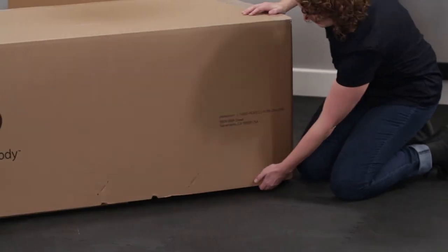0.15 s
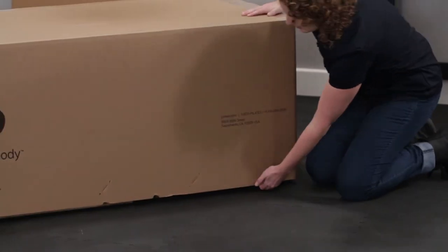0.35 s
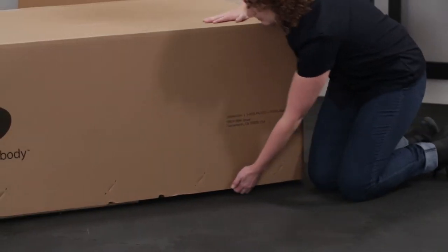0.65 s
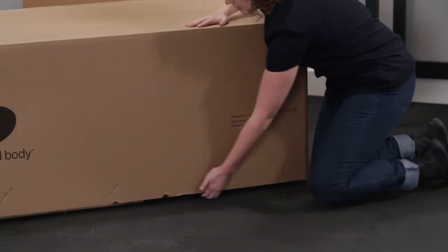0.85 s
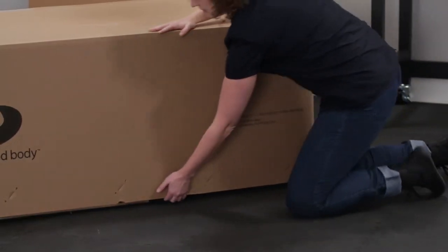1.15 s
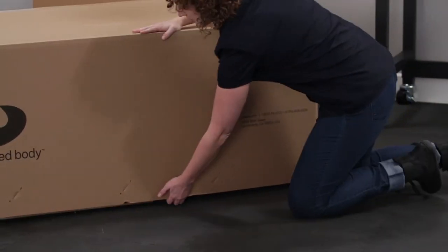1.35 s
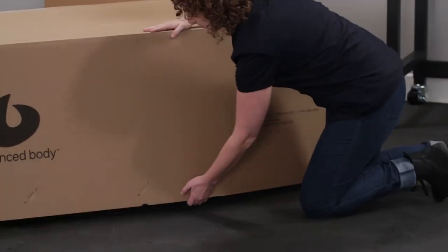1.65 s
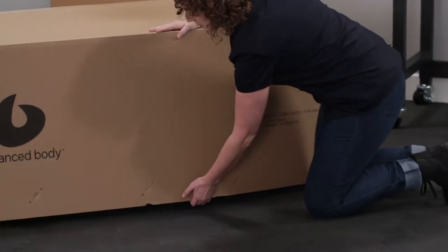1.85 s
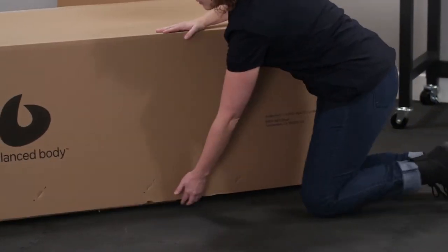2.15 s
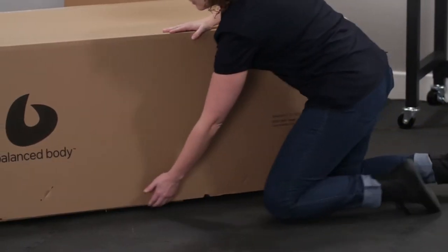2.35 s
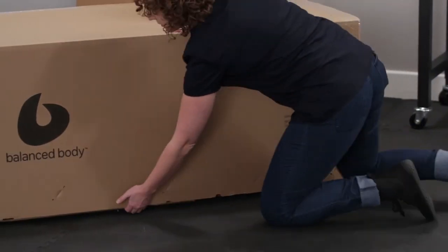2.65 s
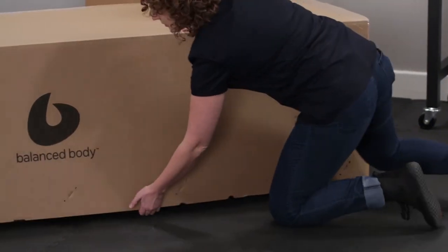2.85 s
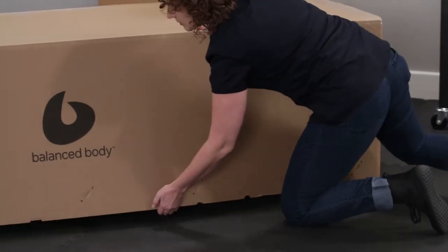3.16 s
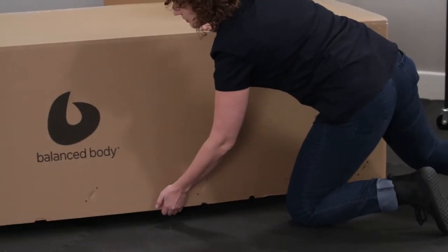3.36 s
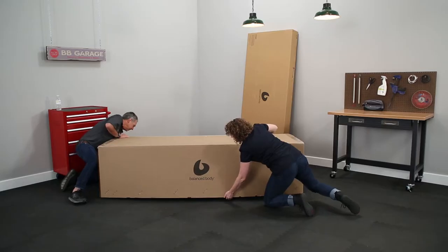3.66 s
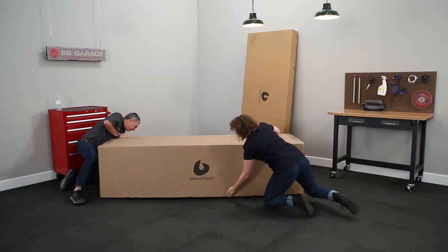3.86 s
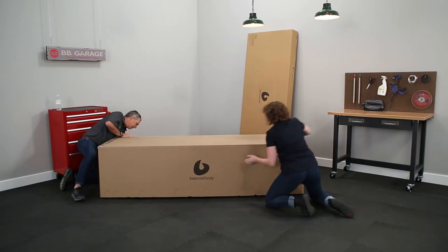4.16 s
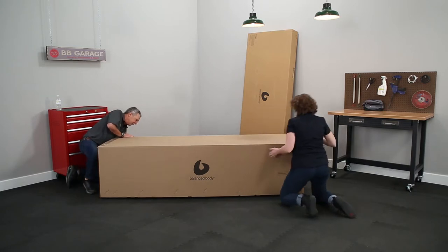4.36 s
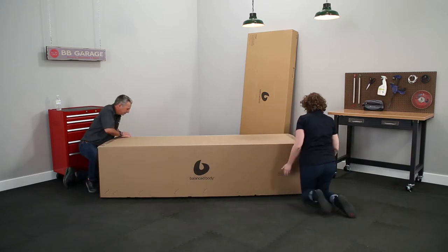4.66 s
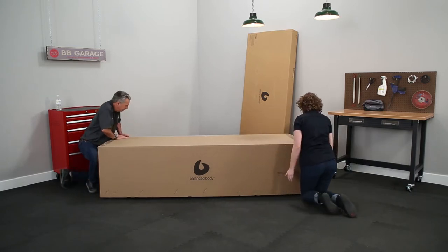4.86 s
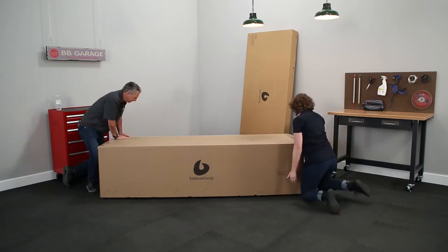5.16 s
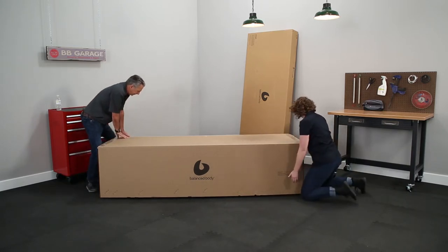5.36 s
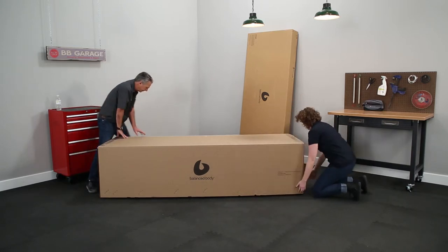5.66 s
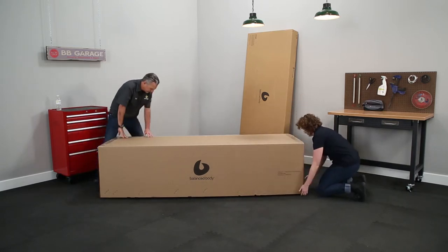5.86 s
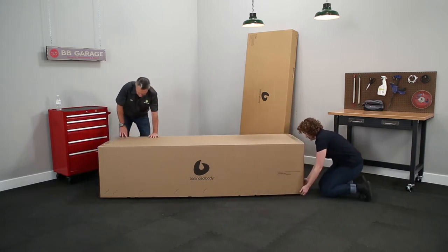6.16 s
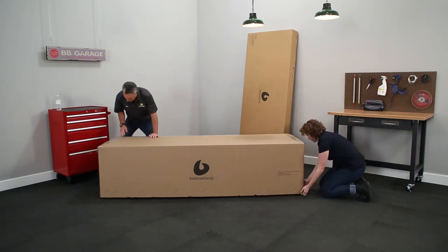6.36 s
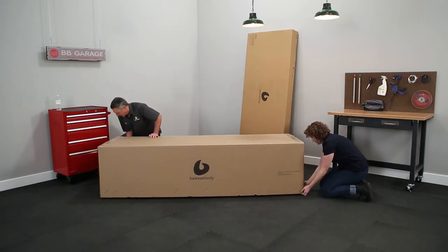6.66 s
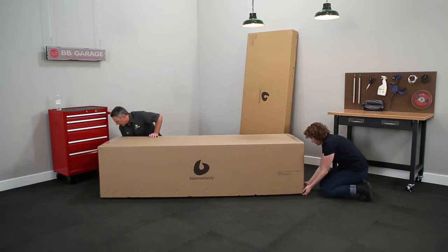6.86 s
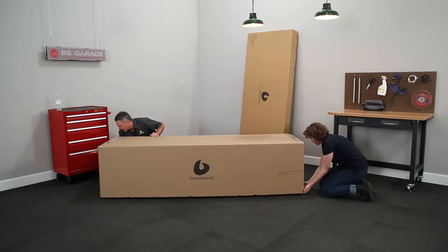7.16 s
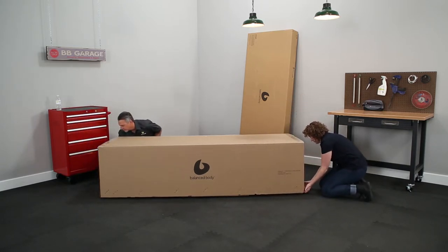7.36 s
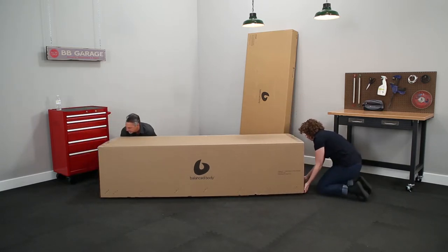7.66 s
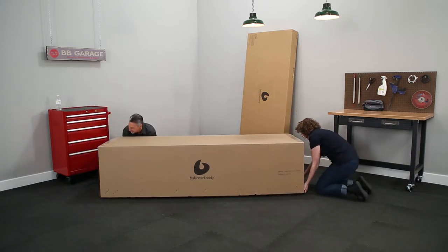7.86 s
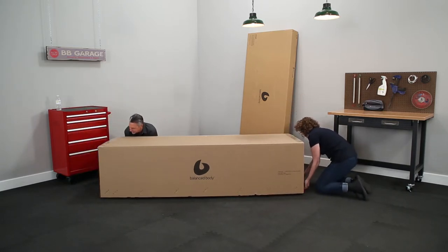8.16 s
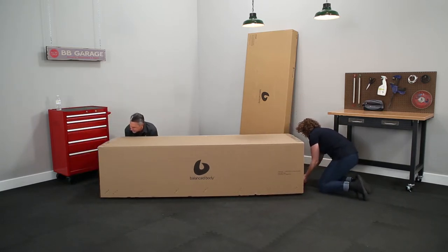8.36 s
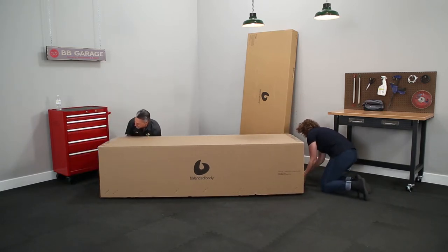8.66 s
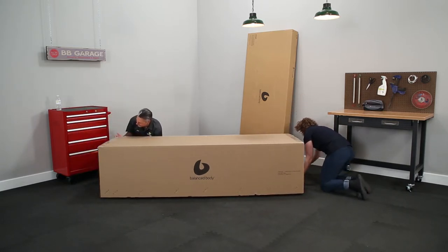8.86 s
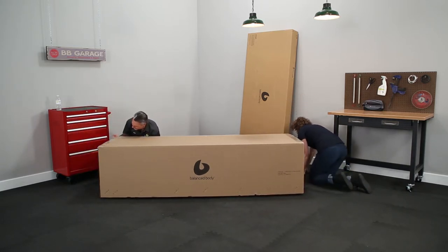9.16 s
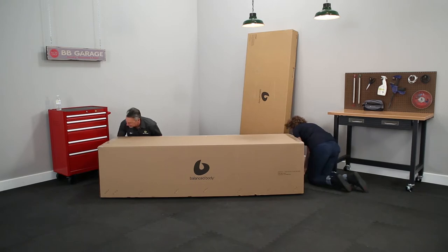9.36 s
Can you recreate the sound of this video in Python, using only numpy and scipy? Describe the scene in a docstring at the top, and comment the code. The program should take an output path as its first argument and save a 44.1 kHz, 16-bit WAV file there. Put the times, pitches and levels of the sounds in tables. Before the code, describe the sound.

In a quiet workshop, two people work staples from a long cardboard crate. A sleeve rustles close against a body-worn microphone while knees shift on a mat. Sharp hollow snaps and brief creaks come early, then scrapes and a cluster of pops around three seconds. A quieter stretch of rustling and light finger ticks follows, before hard snaps near seven and eight seconds. The box booms and the room adds a short tail.

```python
"""A sleeve brushing a body-worn microphone is heard first, with knees shifting on the mat and a steady hush.
Two people work staples out of a long cardboard crate, while cloth and knees go on moving throughout:
the board creaks, scrapes and snaps sharply. Friction is filtered noise under stroke envelopes;
contacts are short forces sent through the panel as bending waves, treble first and bass last,
which then boom in the box and the room."""
import sys
import numpy as np
from scipy import signal
from scipy.fft import rfft, irfft, next_fast_len
from scipy.io import wavfile
from scipy.ndimage import map_coordinates

SR = 44100
rng = np.random.default_rng(int(sys.argv[2]) if len(sys.argv) > 2 else 0)


def master(y):
    """Save y as 16-bit WAV."""
    cut = np.clip(np.atleast_2d(y).T, -1, 1)
    pcm = np.round(cut * 32767)  # scale
    wavfile.write(sys.argv[1], SR, pcm.astype(np.int16))


N = 418950
SIZE = 8192  # samples in one contact
HZ = np.fft.rfftfreq(SIZE, 1 / SR)
LEAD = SIZE // 16  # samples kept free ahead of a contact


def amp(db):
    """Decibels to gain."""
    return 10 ** (np.asarray(db) / 20)


def unit(x):
    """Scale to rms 1."""
    return x / np.sqrt(np.mean(x ** 2) + 1e-20)


def along(points, hz):
    """Read (frequency [Hz], value) points on a log frequency axis."""
    f, v = np.transpose(points)
    return np.interp(np.log(hz + 1), np.log(f + 1), v)


def wobble(rate):
    """A smooth random curve with rate knots a second."""
    coarse = np.arange(0, N, max(1, int(SR / rate) // 10))
    knots = rng.standard_normal(int(N * rate / SR) + 4)
    values = map_coordinates(knots, [coarse * rate / SR])
    return np.interp(np.arange(N), coarse, values)


def filtered(x, response):
    """Multiply the spectrum of x by a response of frequency, which may be complex."""
    m = next_fast_len(N + SR // 2)
    return irfft(rfft(x, m) * response(np.fft.rfftfreq(m, 1 / SR)), m)[:N]


# hush of the workshop at the microphone, spectrum: (frequency [Hz], relative level [dB])
AIR_SPECTRUM = [(15, -34.5), (25, -9), (92, -1), (545, -7.5), (624, -3), (677, -4), (1190, -12.5),
                (4490, -17), (6920, -32.5), (14000, -37), (16000, -13)]


def air():
    """The steady hush of the workshop: noise shaped by its spectrum."""
    hush = filtered(rng.standard_normal(N), lambda hz: amp(along(AIR_SPECTRUM, hz)))
    return amp(-59) * unit(hush)


def rub(spectrum, grain_db, flutter_db, patchy_db):
    """Friction of rms 1: tiny uneven catches under fluttering pressure, their colour shifting with the contact."""
    pressure_db = grain_db * wobble(900) + flutter_db * wobble(35)
    catches = rng.standard_normal(N) * amp(pressure_db)
    hz, t, z = signal.stft(catches, nperseg=512)
    # a random map over pitch and time colours the contact
    place = np.meshgrid(2.5 * np.log2(1 + hz * SR / 300), t / SR * 7, indexing="ij")
    field = map_coordinates(rng.standard_normal((20, 72)), place, mode="nearest")
    shifting = signal.istft(z * amp(patchy_db * field), nperseg=512)[1][:N]
    return unit(filtered(shifting, lambda hz: amp(along(spectrum, hz))))


def strokes(rows, rest_db, unsteady_db):
    """Gain of (start [s], length [s], level [dB]) strokes that speed up, hold and slow, over a faint stirring."""
    rise, fall = 0.22, 0.35  # shares of a stroke spent speeding up and slowing down
    coarse = np.arange(0, N, 32)
    start, length, db = np.transpose(rows)[..., None]
    progress = (coarse / SR - start) / length
    speed = np.clip(np.minimum(progress / rise, (1 - progress) / fall), 0, 1)
    gain = np.sqrt(amp(rest_db) ** 2 + np.sum((amp(db) * speed) ** 2, axis=0))
    return np.interp(np.arange(N), coarse, gain) * amp(unsteady_db * wobble(10))


# knees and shoes shifting on the mat: (start [s], length [s], level [dB])
SHIFTS_ON_MAT = [(-0.03, 0.18, -43.5), (0.13, 0.34, -50), (0.4, 0.21, -46), (0.84, .3, -45),
                 (1.7, 0.66, -48.5), (2.45, 0.23, -60), (2.92, 0.25, -47.5), (3.1, 0.87, -47),
                 (3.68, 0.29, -47.5), (4.08, 0.44, -49.5), (4.56, 0.37, -50), (5.68, .36, -56),
                 (6.25, 0.32, -56), (6.86, 0.25, -56), (7.32, 0.39, -53.5), (7.9, 0.54, -51.5),
                 (9.38, 0.29, -48)]
# spectrum of that shifting: (frequency [Hz], relative level [dB])
KNEE_SPECTRUM = [(20, -32), (45, -4), (85, 2.5), (130, 0.5), (185, -0.5), (260, -1.5), (340, -2),
                 (550, -10), (1200, -26.5)]


def knees():
    """Knees and shoes shift on the mat: strokes of mostly low friction."""
    gain = strokes(SHIFTS_ON_MAT, rest_db=-59, unsteady_db=1.5)
    return gain * rub(KNEE_SPECTRUM, grain_db=2.0, flutter_db=1.5, patchy_db=1.5)


# sleeve or shirt brushing past the body-worn microphone:
# (start [s], length [s], level before mixing [dB], sheen relative to that level [dB])
SHIRT_BRUSHES = [(-0.02, 0.12, -50.5, -19), (0.153, 0.053, -48.5, 0), (0.26, 0.2, -53.5, 0.5),
                 (0.383, 1.16, -44, 5), (0.908, 0.1, -39, 7), (1.625, 0.18, -46, -6),
                 (1.84, .14, -42.5, -3), (2.009, 0.24, -44, -2), (2.331, 0.12, -55.5, -6),
                 (2.614, 0.084, -48.5, -9), (3.21, 0.099, -50, 3), (3.446, .19, -46, 1),
                 (3.985, 0.3, -50, -1), (4.282, .19, -51.5, -8), (4.574, 0.26, -66, 8),
                 (4.692, 0.2, -46.5, 0.5), (5.54, 0.52, -52, -4), (5.896, 0.32, -49, -1.5),
                 (6.173, 0.25, -54, -3), (6.329, 0.22, -48.5, -23), (6.783, 0.13, -57.5, 3),
                 (6.928, 0.042, -50.5, 7), (6.982, 0.12, -51, 0), (7.238, 0.16, -45.5, 1),
                 (7.468, 0.12, -53, 8), (7.654, 0.32, -49, 2), (7.905, 0.11, -46, -5),
                 (7.999, 0.14, -43.5, 2), (8.196, 0.21, -55, -4), (8.375, 0.21, -42.5, -3),
                 (8.614, 0.25, -45, -3), (8.845, 0.26, -47, 5.5), (9.087, 0.31, -48, 1.5),
                 (9.368, 0.24, -46, -4.5)]
# spectrum of the cloth: (frequency [Hz], relative level [dB])
CLOTH_SPECTRUM = [(800, -29.5), (2000, -13.5), (3200, -8), (5000, -5), (8000, -0.5), (12500, 2),
                  (15200, -0.5), (16000, -9)]


def shirts():
    """Cloth brushes close to the microphone: a swish and, above about 9.5 kHz, a sheen with its own level."""
    rest_db = -60.5  # stirring between strokes, before mixing
    swish_rows = [row[:3] for row in SHIRT_BRUSHES]
    sheen_rows = [(s, length, db + sheen_db) for s, length, db, sheen_db in SHIRT_BRUSHES]
    swish_gain = strokes(swish_rows, rest_db, unsteady_db=1.0)
    sheen_gain = strokes(sheen_rows, rest_db, unsteady_db=0.5)
    cloth = rub(CLOTH_SPECTRUM, grain_db=1.0, flutter_db=1.5, patchy_db=2.2)
    swish = filtered(cloth, lambda hz: 1 / (1 + (hz / 9500) ** 6))
    sheen = cloth - swish
    return amp(-3.25) * swish_gain * unit(swish) + amp(-4.6) * sheen_gain * unit(sheen)


def causal(db):
    """A minimum-phase response with this gain in dB, which starts only after the blow."""
    cepstrum = irfft(np.log(amp(db)))
    cepstrum[1:SIZE // 2] *= 2
    cepstrum[SIZE // 2 + 1:] = 0
    return np.exp(rfft(cepstrum))


# colour of the corrugated board: (frequency [Hz], gain [dB])
BOARD_COLOUR = [(20, -40), (32, -26), (50, -12.5), (88, 4), (130, -1), (175, 8), (255, -6), (345, 5),
                (520, -4.5), (650, -1.5), (780, 0), (1000, -4), (1450, -8.5), (1900, -11.5), (2400, -17),
                (3100, -19), (4000, -20.5), (6000, -22), (12000, -29), (16000, -36.5)]


def panel(lag, echo_db, knee_hz=200):
    """Corrugated board carries treble at once, while its bass bends along about lag seconds late."""
    delay = lag * np.exp(0.2133 * rng.standard_normal()) / (1 + (HZ / knee_hz) ** 1.4)
    bending = np.exp(-2j * np.pi * np.cumsum(delay) * SR / SIZE)  # phase sums the delay over frequency
    # edges and folds return the wave many times, duller the longer it has run
    late = rng.uniform(0.002077, .03, (14, 1))  # s
    sign = rng.choice([-1, 1], (14, 1))
    loss_db = echo_db - late * (330 + HZ / 3.85)
    edges = np.sum(sign * amp(loss_db) * np.exp(-2j * np.pi * HZ * late), axis=0)
    # the straight path carries little bass
    direct = 0.78 * rng.choice([-1, 1]) * 1j * HZ / (500 + 1j * HZ)
    direct = direct * np.exp(-2j * np.pi * HZ * rng.uniform(0, 0.00061))
    return causal(along(BOARD_COLOUR, HZ)) * (direct + bending * (1 + edges))


# boom, thump, knock, crack and fizz of the board: (low edge [Hz], high edge [Hz])
CONTACT_BANDS = [(40, 135), (135, 400), (400, 1400), (1400, 4500), (4500, 16000)]
BAND_CENTRES = np.sqrt(np.prod(CONTACT_BANDS, axis=1))  # Hz
OCTAVES = np.log2(BAND_CENTRES / 420)


def balance(tone, db, brightness=0):
    """Level of each band for one contact: the tone of its kind, tilted in dB per octave by its brightness."""
    return db + np.array(tone) + brightness * OCTAVES[:len(tone)]


def add(track, s, force, levels_db, lag, echo_db):
    """Send a force through the panel and place it at s seconds with its own balance from boom to fizz."""
    z = rfft(force, SIZE) * panel(lag, echo_db)
    span = .03 * SR  # band levels count energy over 30 ms
    power = [2 * np.sum(np.abs(z[(HZ >= lo) & (HZ < hi)]) ** 2) / SIZE / span for lo, hi in CONTACT_BANDS]
    correction_db = levels_db - 10 * np.log10(np.array(power) + 1e-20)
    colour = np.column_stack([BAND_CENTRES, correction_db])
    wave = np.roll(irfft(z * causal(along(colour, HZ))), LEAD)
    start = max(round(s * SR) - LEAD, 0)
    track[start:start + SIZE] += wave[:len(track) - start]


def tearing(length, grain_db, release, rise):
    """Uneven breaks, as of fibres, for length seconds, swelling over the share rise; energy 1."""
    t = np.arange(SIZE) / SR
    clumps = np.repeat(rng.standard_normal(SIZE // 32), 32)
    swell = 1 - np.exp(-t / abs(rise * length))
    fade = np.exp(-np.maximum(t - length, 0) / release)
    force = rng.standard_normal(SIZE) * amp(grain_db * clumps) * swell * fade
    return force / np.linalg.norm(force)


SNAP_RISE = .2  # share of its length over which a snap, thud or tick swells


def blow(length):
    """A gritty contact with one blunt push of the board early in it."""
    instant = np.arange(SIZE) == int(.3 * length * SR)
    push = signal.lfilter(*signal.butter(1, 1500, fs=SR), instant)
    return tearing(length, grain_db=3.5, release=0.0029, rise=SNAP_RISE) + 0.59 * push


# crate bumping on the mat or against a knee: (time [s], length [s], strength [dB])
CRATE_BUMPS = [(0.017, .005, -58), (1.716, 0.0039, -17.5), (1.998, 0.0028, -43), (2.131, 0.0059, -44.5),
               (3.19, .021, -25), (3.214, 0.02, -20), (3.465, 0.0013, -34.5), (3.856, 0.0093, -36.5),
               (4.231, .014, -49), (4.364, 0.0096, -53), (4.792, 0.0069, -45.5), (6.799, 0.0043, -36),
               (7.009, 0.01, -42.5), (7.118, 0.0077, -44.5), (7.872, 0.0038, -42), (8.175, .0024, -42),
               (9.436, 0.0078, -42.5)]


def thuds():
    """Soft, heavy contacts that move mostly the bass of the panel."""
    tone = [-6.5, 0, -15, -26, -24.5]  # dB, boom to fizz
    track = np.zeros(N)
    for s, length, db in CRATE_BUMPS:
        add(track, s, blow(length), balance(tone, db), lag=0.0153, echo_db=-13.5)
    return track


# ringing of the hollow crate: (frequency [Hz], width [Hz], relative level [dB])
CRATE_MODES = [(85, 4.8, -1), (163, 14, -7.5), (201, 3.2, -4.5), (321, 24, -2), (745, 100, -5.5),
               (910, 39, -11.5), (1640, 220, -14.5), (2350, 120, -15.5)]


def crate(x):
    """The hollow box rings on in its broad modes, 8 ms behind the board."""
    def modes(f):
        return sum(amp(db) * 1j * f * width / (centre * centre - f * f + 1j * f * width)
                   for centre, width, db in CRATE_MODES)
    return filtered(x, lambda f: modes(f) * np.exp(-2j * np.pi * f * .008))


# time for the workshop's tail to fall 60 dB: (frequency [Hz], time [s])
ROOM_DECAY = [(60, 1), (170, 0.56), (420, 0.37), (1100, 0.55), (3000, 0.41), (10000, 0.088)]
# strength of that tail at the microphone: (frequency [Hz], level [dB])
ROOM_TAIL_LEVEL = [(60, -8.5), (200, -11), (500, -13.5), (800, -17), (1400, -17), (1900, -15),
                   (2500, -18.5), (10000, -14.5)]


def room(x, count=12):
    """Diffuse tails of decaying noise, a fresh one for each of count equal stretches of time."""
    wet = np.zeros(N + SR)
    for part in np.array_split(np.arange(N), count):
        hz, t, z = signal.stft(rng.standard_normal(SR * 3 // 4), SR, nperseg=256)
        fall = amp(-60 * t / along(ROOM_DECAY, hz)[:, None])
        decay = fall * (1 - np.exp(-t / 0.0092))  # the tail builds up over some 9 ms
        level = amp(along(ROOM_TAIL_LEVEL, hz))[:, None]
        decay *= level / np.sqrt(np.mean(decay ** 2, axis=1, keepdims=True))
        tail = signal.istft(z * decay, SR, nperseg=256)[1]
        answer = signal.fftconvolve(x[part], tail / np.sqrt(len(tail)))
        wet[part[0]:part[0] + len(answer)] += answer
    return wet[:N]


def crackle(rate=28, spread_db=5):
    """Small ticks of the paper skin under the hands, about rate a second: decaying noise bursts of rms 1."""
    strength = amp(spread_db * np.clip(rng.standard_normal(N), -2, 1.5))
    catches = (rng.random(N) < rate / SR) * strength
    envelope = signal.lfilter([1], [1, -np.exp(-1 / (0.0018 * SR))], catches)
    # paper skin: (frequency [Hz], relative level [dB])
    skin = [(150, -25.0), (500, 1), (1500, -7.5), (3200, -10), (8000, -7.0), (16000, -13.5)]
    return unit(filtered(envelope * rng.standard_normal(N), lambda hz: amp(along(skin, hz))))


# palms sliding on the board: (start [s], length [s], friction level [dB])
PALM_SLIDES = [(0.27, 0.12, -50), (0.82, 0.24, -46), (1.1, 0.31, -60), (1.68, 0.17, -54), (2.4, 0.29, -60),
               (3.1, 0.33, -46), (3.46, 0.21, -51), (4.08, 0.44, -54.5), (4.58, 0.34, -52.5),
               (5.56, 0.26, -54), (5.75, 0.5, -57.5), (6.33, 0.24, -51), (6.82, 0.3, -57.5),
               (7.33, 0.58, -57), (7.85, 0.27, -55), (8.44, 0.3, -58), (8.9, 0.24, -53.5), (9.2, 0.26, -57)]
# spectrum of skin on board: (frequency [Hz], relative level [dB])
PALM_SPECTRUM = [(150, -26.5), (400, -3), (900, 1), (1700, -2), (3000, -7), (4500, -7), (9000, -33)]


def palms():
    """Palms slide on the board: fluttering friction with the crackle of its paper skin."""
    friction = rub(PALM_SPECTRUM, grain_db=2.0, flutter_db=5.0, patchy_db=2.5)
    gain = strokes(PALM_SLIDES, rest_db=-64.5, unsteady_db=-1.5)
    return gain * (friction + amp(-4) * crackle())


# staples letting go of the board: (time [s], length [s], strength before track gain [dB],
# brightness [dB per octave], fizz of torn fibres before track gain [dB])
STAPLE_SNAPS = [(0.362, 0.0088, -23.5, 1.1, -33.5), (0.713, 0.0025, -44, 5, -44.5),
                (0.78, 0.0052, -20, 1.1, -36), (1.125, 0.0083, -44.5, 3, -54),
                (1.5604, 0.0028, -14.5, -1.4, -35), (1.69, 0.0051, -20, 1.2, -38.5),
                (3.077, 0.0064, -24, 1.2, -38), (3.127, 0.013, -30, -1.8, -58.5),
                (3.153, 0.0053, -26.5, 1.5, -42), (3.166, 0.0023, -23, 0.1, -45.5),
                (3.667, 0.0039, -49.5, 5, -62), (3.679, 0.0028, -42.5, 3, -67),
                (3.712, 0.0045, -32.5, -0.5, -52), (4.591, 0.0026, -50, 2, -59),
                (6.806, 0.0031, -40, 7, -41), (7.22, 0.0089, -49.5, 6.5, -38.5),
                (7.235, 0.0079, -21.5, 3.5, -31.5), (7.286, 0.0064, -18, 0.5, -31),
                (8.344, 0.0039, -20.5, 3, -45), (8.349, 0.0055, -15, 1, -35.5),
                (8.358, 0.0031, -23.5, -2.5, -23.5), (8.379, 0.0034, -29.5, -1.8, -51),
                (8.486, 0.0014, -35.5, 4, -35)]


def snaps():
    """A staple lets go and jolts the panel."""
    tone = [-5, 0, -0.5, -11.5]  # dB, boom to crack
    swell_s, swell_db = .009, -22  # a faint noise swell before the snap
    track = np.zeros(N)
    for s, length, db, brightness, fizz_db in STAPLE_SNAPS:
        swell = tearing(swell_s, grain_db=5.5, release=0.0022, rise=1)
        swell = np.roll(swell, -min(int(swell_s * SR), LEAD))
        force = blow(length) + amp(swell_db) * swell
        levels_db = np.append(balance(tone, db, brightness), fizz_db)
        add(track, s, force, levels_db, lag=0.01614, echo_db=-11.0)
    return track * amp(2.6)


# fingers picking at staples and the paper skin: (time [s], strength [dB], brightness [dB per octave])
FINGER_TICKS = [(0.602, -51.5, 1.5), (1.998, -62, 4.5), (2.132, -52, 3), (3.226, -50, 1),
                (3.326, -46, -0.5), (3.354, -52, .5), (4.558, -53.5, -1.5), (4.618, -67.5, 3.5),
                (4.639, -76, 4.5), (4.684, -51, -1), (4.751, -53, 0), (5.376, -67, 2), (5.39, -70, 4.5),
                (5.451, -53, -0.2), (6.212, -62, 2), (6.23, -61, 1.5), (6.387, -53.5, 1.3),
                (6.786, -53.5, 1.3), (6.99, -51, -.5), (7.109, -49.5, -0.6), (8.223, -57, 1.7)]


def ticks():
    """Light, sharp, very short contacts, with weak returns from the edges like those of thuds and scrapes."""
    tone = [-14.5, -1, -5.5, -3, 0]  # dB, boom to fizz
    track = np.zeros(N)
    for s, db, brightness in FINGER_TICKS:
        force = tearing(.0005, grain_db=5, release=.0006, rise=SNAP_RISE)
        add(track, s, force, balance(tone, db, brightness), lag=0.0119, echo_db=-14)
    return track


# staple slipping in jerks: (time [s], length [s], strength before track gain [dB],
# brightness [dB per octave], fizz before track gain [dB])
STAPLE_CREAKS = [(0.749, .031, -24.5, 1.3, -34.5), (1.547, .0099, -24, -1.5, -49)]


def creaks(slip_hz=300, jitter=0.044, wire_hz=5200):
    """Stick and slip: a quick train of growing jerks over torn grit, making the staple wire buzz."""
    tone = [-15.5, 2, -5.5, -6.5]  # dB, boom to crack
    track = np.zeros(N)
    for s, length, db, brightness, fizz_db in STAPLE_CREAKS:
        slips = np.cumsum(1 + jitter * rng.standard_normal(40)) / slip_hz - 1 / slip_hz
        slips = np.abs(slips[slips < length])
        jerks = np.bincount((slips * SR).astype(int), 1.4 + slips / length, SIZE)
        force = jerks + 3.6 * tearing(length, grain_db=-1, release=0.0014, rise=.05)
        force = force + 2.5 * signal.lfilter(*signal.iirpeak(wire_hz, 4, fs=SR), force)
        levels_db = np.append(balance(tone, db, brightness), fizz_db)
        add(track, s, force, levels_db, lag=0.0068, echo_db=-10)
    return track * amp(2.5)


# flap rubbing on the board: (time [s], length [s], strength before track gain [dB],
# brightness [dB per octave], fizz before track gain [dB])
FLAP_SCRAPES = [(2.786, 0.014, -35.5, -1.5, -47), (2.799, 0.013, -25.5, -0.37, -30),
                (2.868, 0.029, -39.5, -1.3, -43), (2.887, 0.017, -32.5, -0.18, -37),
                (2.903, 0.02, -29.5, -.5, -28.5), (3.721, 0.011, -34, -2.8, -44),
                (3.849, 0.045, -37.5, 0.48, -31), (8.664, 0.017, -38, 1, -39), (8.68, 0.014, -37, 1, -33.5)]


def scrapes():
    """A flap drags over the board in short gritty strokes."""
    tone = [-12.5, -2.5, -9, -15]  # dB, boom to crack
    track = np.zeros(N)
    for s, length, db, brightness, fizz_db in FLAP_SCRAPES:
        force = tearing(length, grain_db=3.0, release=0.0034, rise=.4)
        levels_db = np.append(balance(tone, db, brightness), fizz_db)
        add(track, s, force, levels_db, lag=.018, echo_db=-14.5)
    return track * amp(2.5)


def squeak():
    """A sole catches on the mat: a brief swell of narrow-band noise."""
    time_s, length_s, centre_hz = 4.238, 0.0049, 1790
    swell = np.exp(-((np.arange(N) / SR - time_s) / length_s) ** 2)
    band = signal.butter(2, [.9 * centre_hz, 1.1 * centre_hz], "bandpass", fs=SR)
    return amp(-45) * swell * unit(signal.lfilter(*band, rng.standard_normal(N)))


def scene():
    """Board sounds with their box and room, over the movement of the two people."""
    movement = knees() + shirts() + palms()
    board = thuds() + snaps() + ticks() + creaks() + scrapes()
    board = board + amp(-11.0) * crate(board)
    return (air() + movement + board + room(board) + squeak())[None]


def record(dry):
    """The loudest peaks flatten towards full scale; a steep filter then cuts everything above 16 kHz."""
    flattened = dry[0] / (1 + np.abs(dry[0]) ** 8) ** (1 / 8)
    return filtered(flattened, lambda hz: 1 / (1 + (hz / 16000) ** 200))[None]


dry = scene()
out = record(dry)
master(out)
```